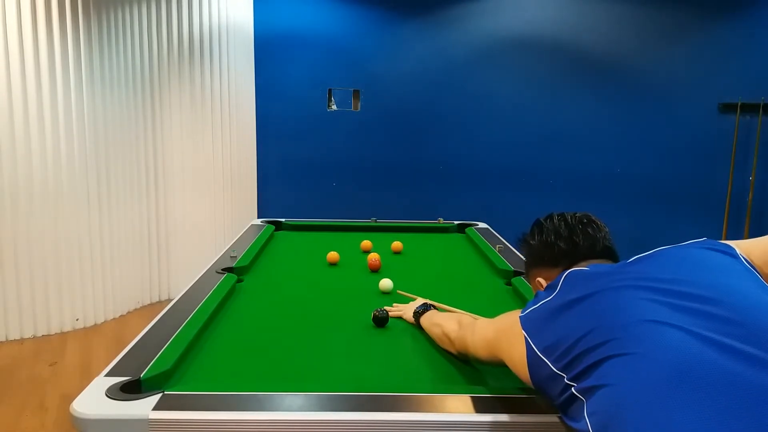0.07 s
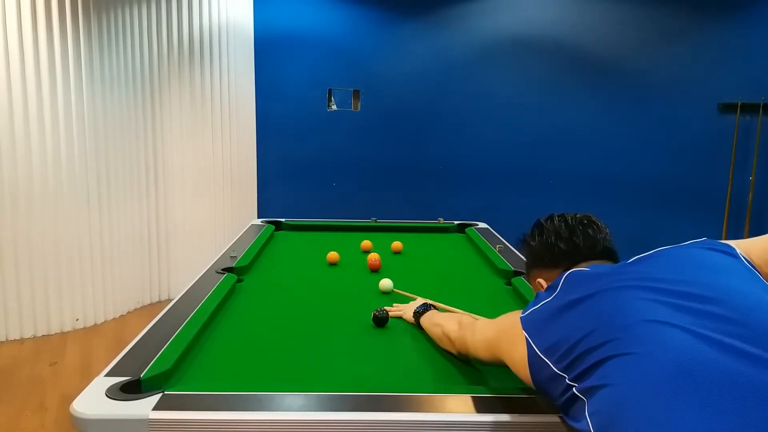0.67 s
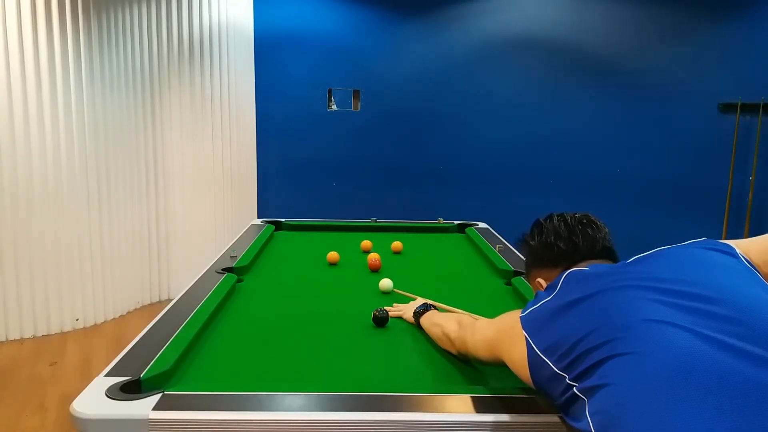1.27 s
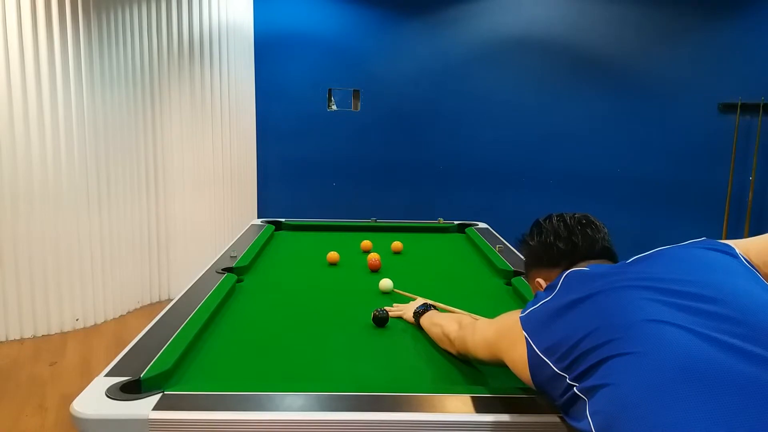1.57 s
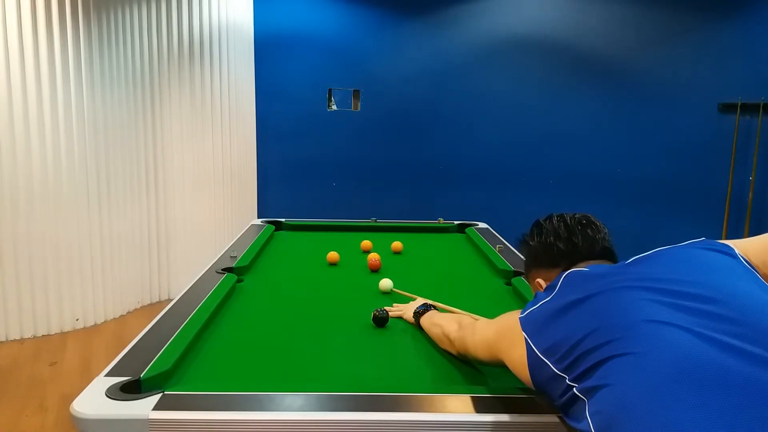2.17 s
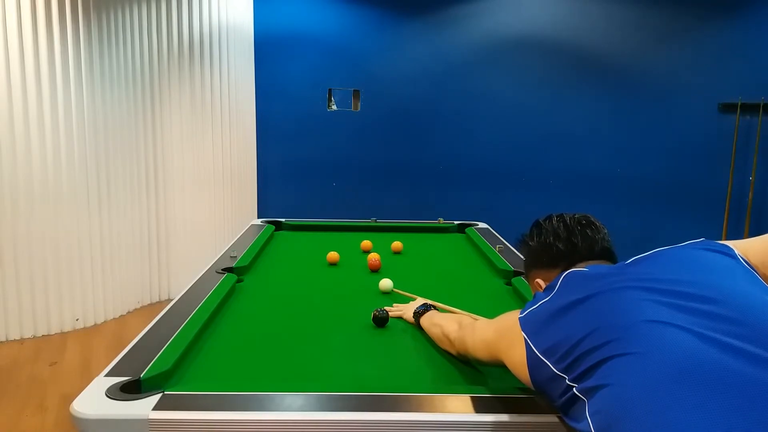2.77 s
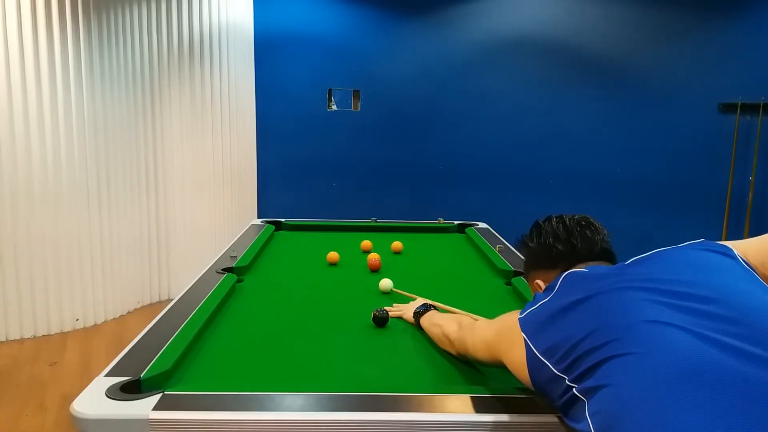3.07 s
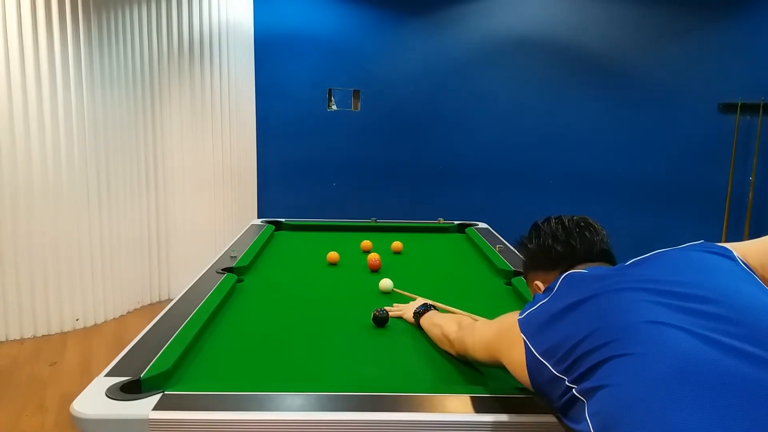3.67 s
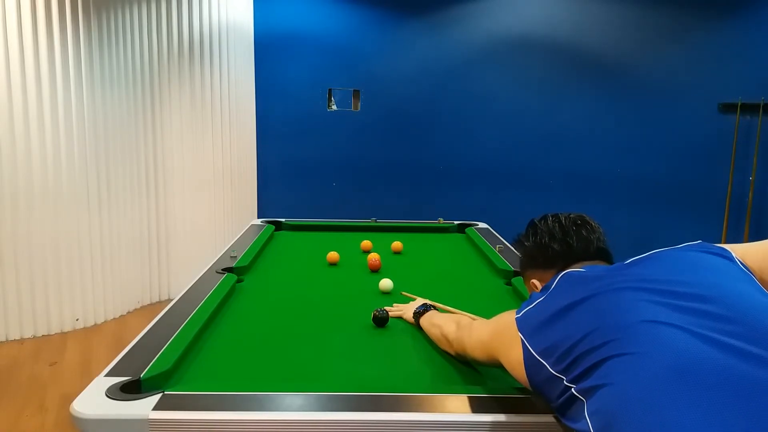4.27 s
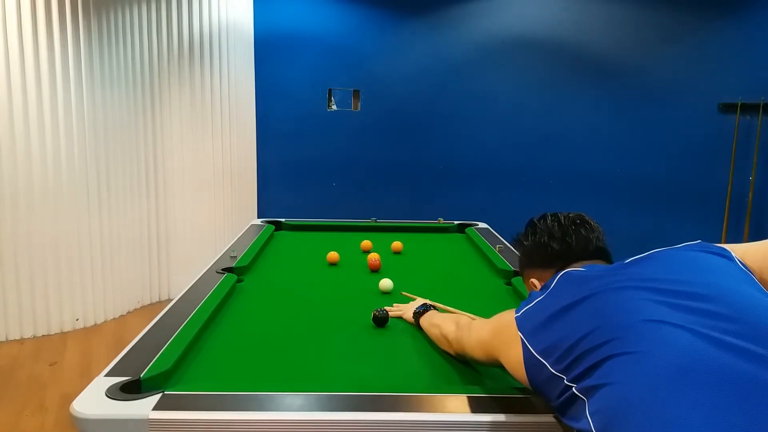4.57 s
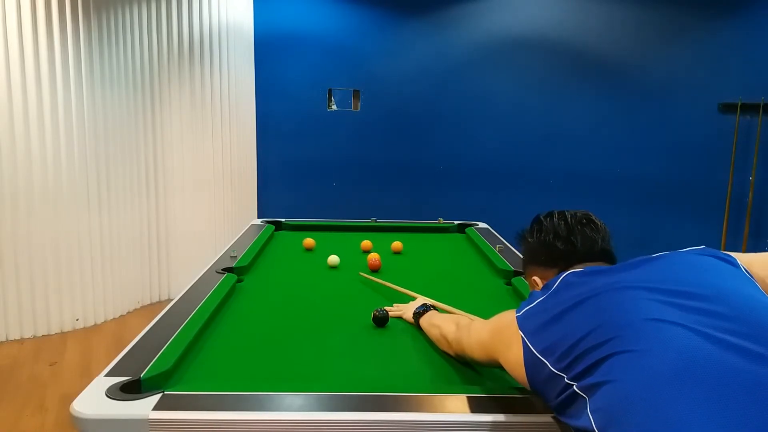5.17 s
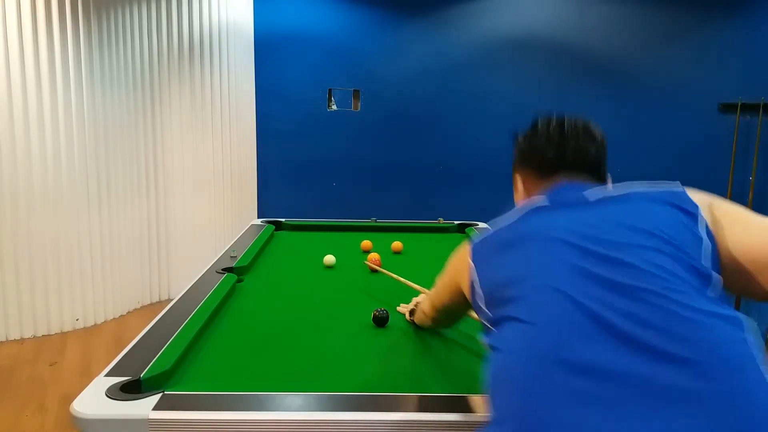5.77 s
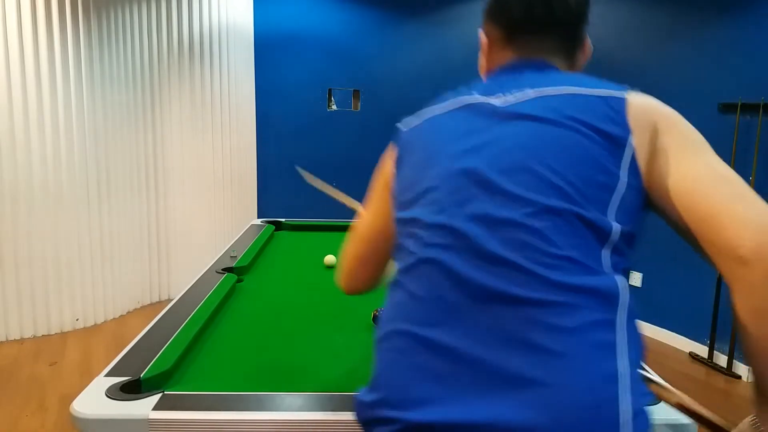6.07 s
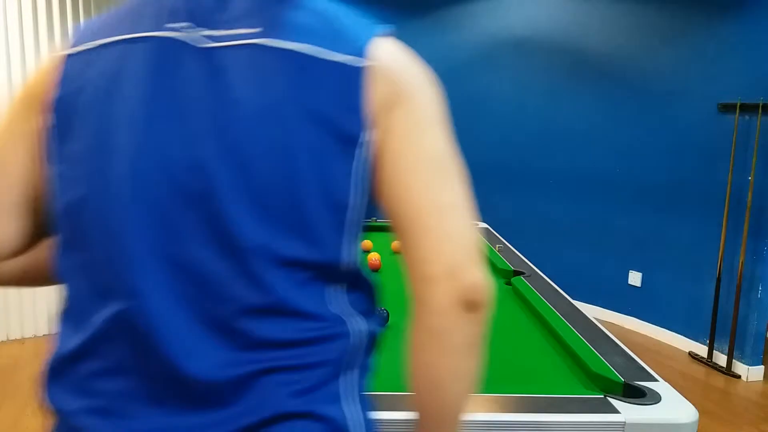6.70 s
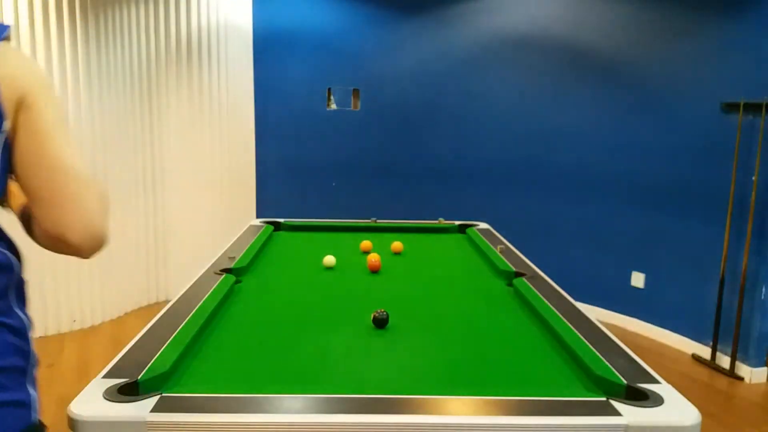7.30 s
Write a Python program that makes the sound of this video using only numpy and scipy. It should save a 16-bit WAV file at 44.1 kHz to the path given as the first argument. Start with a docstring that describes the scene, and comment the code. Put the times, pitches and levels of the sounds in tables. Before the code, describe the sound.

A single pool shot is heard from near the table in a quiet, reverberant room. At first there is only a low ventilation hum. Then comes the tap of the cue, a bright click of ball on ball, and the thud of a ball falling into a pocket. Clothes rustle as the player steps away, while the ball rolls hollowly inside the table and ends with loud knocks in the tray.

```python
"""A pool shot in a bare, echoing room: the cue's impact rings the shaft, and the cue ball clicks on an
object ball. That ball rolls over the cloth, bumps the jaws, drops into a pocket, rumbles down the return
channel and knocks into the tray. Each impact is a body's impulse response convolved with the room's;
rolling and friction are coloured noise under an envelope. The player steps away with rustling clothes.
Ventilation hums faintly throughout, and a far squeak sounds at the start."""
import sys
import numpy as np
from scipy import signal
from scipy.fft import rfft, irfft, next_fast_len
from scipy.io import wavfile
from scipy.ndimage import uniform_filter1d

SR = 44100
rng = np.random.default_rng(int(sys.argv[2]) if len(sys.argv) > 2 else 0)


def transcribe(u):
    """Save the signal u as a 16-bit wav file named by the first command-line argument.

    u: samples, shape (n,) or (channels, n), limited to [-1, 1]; the rate is SR.
    q: integer samples, one column per channel.
    """
    v = np.clip(np.atleast_2d(u).T, -1, 1)
    q = np.round(v * 32767).astype(np.int16)
    wavfile.write(sys.argv[1], SR, q)


N = 328104


def from_db(db):
    """Amplitude ratio of a level: a factor of ten per 20 dB."""
    return 10 ** (np.asarray(db) / 20)

def rms_one(x):
    """Normalisation to unit mean power."""
    return x / np.sqrt(np.mean(x ** 2) + 1e-20)

def at_hz(points, hz):
    """Interpolation of a table on a log-frequency axis."""
    f, value = np.transpose(points)
    return np.interp(np.log(np.maximum(hz, 1)), np.log(f), value)

def swell(middle_s, half_s):
    """Gaussian envelope of a movement that speeds up and slows down."""
    return np.exp(-np.minimum(((np.arange(N) / SR - middle_s) / half_s) ** 2, 20))

def stroke(peak_s, rise_s, t60):
    """Gaussian rise to a peak, then exponential decay."""
    since = np.arange(N) / SR - peak_s
    return np.where(since < 0, swell(peak_s, rise_s), from_db(-60 * np.abs(since) / t60))

def power_sum(gains):
    """Incoherent addition: the powers of unrelated noises add."""
    return np.sqrt(sum(gain ** 2 for gain in gains))

def balance(db):
    """Interchannel level difference, left minus right, as two gains."""
    return from_db(np.array([[.5], [-.5]]) * db)

# Coherence of left and right: (frequency [Hz], correlation [-1 to 1])
COHERENCE = [(40, .9), (120, .97), (250, .85), (500, .5), (1000, .05), (2000, -.05), (8000, -.05)]
def diffuse(size):
    """Spectrum of a diffuse white field: two points agree at long wavelengths only."""
    hz = np.fft.rfftfreq(size, 1 / SR)
    mid, side = rfft(rng.standard_normal((2, size)))
    alike = np.clip(at_hz(COHERENCE, hz), -1, 1)
    return hz, (np.sqrt(1 + alike) * mid + np.sqrt(1 - alike) * side * [[1], [-1]]) / np.sqrt(2)

def noise(spectrum):
    """Spectral shaping of diffuse noise, at unit rms."""
    size = next_fast_len(N, True)
    hz, white = diffuse(size)
    return rms_one(irfft(white * from_db(at_hz(spectrum, hz)) * (hz > 20), size)[:, :N])

def body(spectrum, modes, size=32768):
    """Impulse response of unit energy: Lorentzian resonances on a broad spectrum."""
    hz = np.fft.rfftfreq(size, 1 / SR)
    gain = from_db(at_hz(spectrum, hz))
    for f, width, db in modes:
        gain = gain * np.sqrt(1 + (from_db(db) ** 2 - 1) / (1 + (2 * (hz - f) / width) ** 2))
    cepstrum = irfft(np.log(gain))
    cepstrum[1:size // 2] *= 2  # minimum phase: nothing sounds before the contact
    cepstrum[size // 2 + 1:] = 0
    response = irfft(np.exp(rfft(cepstrum)))
    return response / np.sqrt(np.sum(response ** 2))

# Reverberation time: (frequency [Hz], T60 [s])
ROOM_T60 = [(100, 0.42), (250, 0.9), (700, 1.22), (1400, 1.53), (2300, 1.4), (4000, 1.055), (8000, 0.8),
            (15000, 0.51)]
# Early reflections: (left delay [s], right delay [s], level [dB])
REFLECTIONS = [(.0035, .0035, -10.5), (.0058, 0.0042, -5), (.0082, .0088, -9.5), (0.0236, 0.012, -45)]
def room(direct_db, wet_db, build_s, shade_hz, count, size=57344):
    """Room impulse responses: direct sound, reflections and a tail that decays band by band."""
    t, hz = np.arange(size) / SR, np.fft.rfftfreq(size, 1 / SR)
    white = np.array([diffuse(size)[1] for spot in range(count)], np.complex64)
    tail = np.zeros((count, 2, size), np.float32)
    centres, t60s = np.transpose(ROOM_T60)
    for t60, share in zip(t60s, np.eye(len(centres))):
        band = at_hz(np.c_[centres, share], hz).astype(np.float32)
        tail += irfft(white * band) * from_db(-60 * t / t60).astype(np.float32)
    early = np.zeros((2, size))
    early[:, 0] = 1
    for left_s, right_s, db in REFLECTIONS:
        early[[0, 1], [round(left_s * SR), round(right_s * SR)]] += from_db(db)
    # the table and the player's body screen the treble from the early paths
    early = signal.lfilter(*signal.butter(2, shade_hz, fs=SR), early + 1e-18)
    return from_db(direct_db) * early + from_db(wet_db) * (1 - np.exp(-t / build_s)) * tail

def radiate(hits, response, direct_db, wet_db, build_s, shade_hz):
    """Superposition: at each hit the response is convolved with its own path through the room."""
    out = np.zeros((2, N))
    for (s, db), path in zip(hits, room(direct_db, wet_db, build_s, shade_hz, len(hits))):
        start = round(s * SR)
        heard = signal.fftconvolve(path[:, :N - start], response[None], axes=1)[:, :N - start]
        out[:, start:start + heard.shape[1]] += from_db(db) * heard
    return out

# Ventilation hum and microphone hiss: (frequency [Hz], level [dB])
AIR_SPECTRUM = [(15, -44), (25, -16), (37, -0.5), (64, -8.5), (86, -1), (116, -5), (144, 0.5), (173, -10.5),
                (193, -6), (221, -12.5), (289, -8.5), (445, -17), (2120, -20.5), (7100, -37),
                (15500, -28.5)]
def ventilation(level_db=-62):
    """Stationary noise: a low hum under faint hiss, a little louder on the right."""
    return from_db(level_db) * balance(-1.4) * noise(AIR_SPECTRUM)

def squeak(start_hz=1300, sag_hz_per_s=320, waver_depth=.04):
    """Frequency modulation: a faint, far tone wavers at random as its pitch sags."""
    t = np.arange(SR) / SR
    waver = rms_one(uniform_filter1d(rng.standard_normal(SR), size=300))
    pitch = (start_hz - sag_hz_per_s * t) * (1 + waver_depth * waver)
    tone = swell(middle_s=.15, half_s=.17)[:SR] * np.sin(2 * np.pi * np.cumsum(pitch) / SR)
    return radiate([(.0033, -73)], tone, direct_db=-2, wet_db=-36, build_s=.01, shade_hz=3000)

# Blows on the floor and on the cabinet panels: (time [s], level [dB])
STEPS = [(6.58, -26), (6.83, -26.5)]
PANEL_HITS = [(4.935, -21.5), (7.225, -23), (7.407, -8), (7.424, -14)]
# Boom of either surface: (frequency [Hz], level [dB])
PANEL_SPECTRUM = [(25, -47), (50, -27), (66, -14), (95, -16), (140, -10), (400, -30), (2000, -70)]
# Its resonances: (frequency [Hz], bandwidth [Hz], gain [dB])
PANEL_MODES = [(70, 12, 9), (92, 16, 13)]
def floor_and_panels():
    """Plate vibration: footfalls on the wooden floor and blows on the cabinet excite low modes."""
    plate = body(PANEL_SPECTRUM, PANEL_MODES)
    steps = radiate(STEPS, plate, direct_db=-4, wet_db=-24.5, build_s=.004, shade_hz=1030)
    boom = radiate(PANEL_HITS, plate, direct_db=3, wet_db=-20, build_s=.0035, shade_hz=1000)
    return steps + boom

# Small contacts as the player moves: (time [s], level [dB])
TICK_HITS = [(5.453, -30), (6.265, -33), (6.422, -17.5), (7.0675, -34)]
SNAP_HITS = [(6.7658, -20)]
# Their spectra: (frequency [Hz], level [dB])
TICK_SPECTRUM = [(40, -39), (500, 16), (2500, 6), (4700, 6.5), (6500, -1), (8500, 0.5), (15000, -11)]
SNAP_SPECTRUM = [(30, -37), (200, 7), (1000, -2), (2500, -7), (6000, -12), (10000, -10), (15000, -13)]
# Resonances of the snap: (frequency [Hz], bandwidth [Hz], gain [dB])
SNAP_MODES = [(2300, 600, 4), (10000, 1300, 11)]
def ticks_and_snap():
    """Broadband transients: light ticks and one thin snap close by."""
    ticks = radiate(TICK_HITS, body(TICK_SPECTRUM, []),
                    direct_db=2, wet_db=-19.5, build_s=.0018, shade_hz=4000)
    snap = radiate(SNAP_HITS, body(SNAP_SPECTRUM, SNAP_MODES),
                   direct_db=3.5, wet_db=-24, build_s=.002, shade_hz=14000)
    return ticks + snap

# The player straightens, turns, swings an arm, walks on: (time [s], half length [s], level [dB])
MOVES = [(5.806, 0.17, -41), (6.246, 0.19, -39.5), (6.96, 0.049, -44), (6.955, .28, -46)]
# Strokes over the cloth: (peak time [s], rise [s], level [dB])
BRUSHES = [(5.10, 0.044, -67), (5.68, 0.38, -58), (5.752, 0.018, -38.5), (5.96, .04, -55), (6.25, .1, -59),
           (6.76, 0.048, -55.5), (6.96, .05, -48), (7.085, 0.029, -49.5)]
# Rustling clothes and brushed nap: (frequency [Hz], level [dB])
RUSTLE_SPECTRUM = [(40, -33), (200, -7), (800, -21), (1500, 13), (2300, 18.5), (4000, 6), (6500, -5.5),
                   (15000, -23)]
NAP_SPECTRUM = [(300, -40), (2000, 7), (4500, 9), (6500, -5), (9000, 4), (15500, -3)]
def rubbing_fabric():
    """Friction noise: clothes rustle, and hand, cue or sleeve brushes the cloth."""
    rustle = power_sum(from_db(db) * swell(s, half_s) for s, half_s, db in MOVES)
    swish = power_sum(from_db(db) * stroke(s, rise_s, t60=.6) for s, rise_s, db in BRUSHES)
    return rustle * noise(RUSTLE_SPECTRUM) + swish * noise(NAP_SPECTRUM)

# A ball is sent rolling by the cue, the other ball or a cushion: (peak time [s], level [dB])
ROLLS = [(4.92, -46), (5.07, -51), (5.55, -49)]
# Rumble on the slate: (frequency [Hz], level [dB])
SLATE_SPECTRUM = [(40, -32), (100, 7.5), (140, -5.5), (200, 9), (280, -10), (500, -16), (1500, -41)]
def table_roll(nap_db=-12.5):
    """Rolling noise: the slate's rumble and the nap's hiss decay as a ball slows."""
    envelope = power_sum(from_db(db) * stroke(s, rise_s=.017, t60=2.24) for s, db in ROLLS)
    return envelope * (noise(SLATE_SPECTRUM) + from_db(nap_db) * noise(NAP_SPECTRUM))

# The ball runs onto the pocket's lip, then into the channel: (peak time [s], level [dB])
TUMBLES = [(5.75, -41), (6.3, -38.5)]
# Hollow rumble of the channel: (frequency [Hz], level [dB])
RUMBLE_SPECTRUM = [(40, -23), (100, -10), (200, 1), (340, 4.5), (480, -3.5), (700, -3), (1200, -9),
                   (3000, -34)]
def channel_roll(slope_start_s=6.24, slope_db=-53, growth_db_per_s=12.5):
    """Rolling noise grows with speed: two tumbles, then a crescendo down the slope."""
    tumbles = power_sum(from_db(db) * stroke(s, rise_s=.08, t60=1.2) for s, db in TUMBLES)
    since = np.arange(N) / SR - slope_start_s
    slope = from_db(slope_db + growth_db_per_s * since) * (since > 0)
    return power_sum([tumbles, slope]) * noise(RUMBLE_SPECTRUM)

# Knocks in the return channel and the tray: (time [s], level [dB])
CHANNEL_HITS = [(7.165, 6), (7.169, 11.5), (7.178, 12), (7.224, 8.5), (7.258, 3.5)]
TRAY_HITS = [(7.329, 6.2), (7.335, 15.7), (7.359, 6.9), (7.378, 7), (7.407, 2.5), (7.431, 2.35)]
# Their spectra: (frequency [Hz], level [dB])
CHANNEL_SPECTRUM = [(25, -47), (60, -30), (120, -9.5), (230, 1.5), (600, 0.5), (1200, -2), (2000, -10.5),
                    (3000, -24), (4500, -34.5), (6500, -50), (15000, -54)]
TRAY_SPECTRUM = [(25, -43), (90, -6.5), (220, 2), (400, -12), (600, 1.5), (1100, -2), (2000, -2),
                 (3000, -12.5), (4700, -17), (6500, -28.5), (9000, -25), (15000, -38)]
# Their resonances: (frequency [Hz], bandwidth [Hz], gain [dB])
CHANNEL_MODES = [(237, 14, 6), (361, 14, 3), (517, 14, 10), (657, 12, 5), (748, 14, 9), (1007, 14, 5),
                 (1303, 18, 8), (2580, 36, 9)]
TRAY_MODES = [(203, 14, 11), (232, 14, 11), (538, 14, 15), (1000, 40, 5), (1491, 20, 9), (1663, 20, 11),
              (2480, 60, 6), (3100, 36, 19), (3580, 60, 7), (4720, 90, 10)]
def ball_return():
    """Modal ringing: the ball knocks dully inside the cabinet, then more brightly in the tray."""
    channel = radiate(CHANNEL_HITS, body(CHANNEL_SPECTRUM, CHANNEL_MODES),
                      direct_db=-9.5, wet_db=-28.5, build_s=.00068, shade_hz=1540)
    tray = radiate(TRAY_HITS, body(TRAY_SPECTRUM, TRAY_MODES),
                   direct_db=-8.5, wet_db=-32, build_s=.00078, shade_hz=3520)
    return channel + tray

# Impacts on the jaws and liner, and on the pocket floor: (time [s], level [dB])
JAW_HITS = [(5.715, -2.5), (5.738, 3), (5.749, 6.5), (5.761, 7), (5.778, 2.5), (5.812, -0.5), (5.930, 8.5)]
DROP_HITS = [(5.8722, 12.9), (5.8785, 10.4), (5.902, 2.9), (5.928, 3.3)]
# Their spectra: (frequency [Hz], level [dB])
JAW_SPECTRUM = [(25, -52), (50, -21), (90, -12.5), (190, 0.5), (340, -5), (450, -6.5), (900, -10.5),
                (2200, -20.5), (4000, -40), (6500, -39), (15000, -58)]
DROP_SPECTRUM = [(50, -21), (120, -10), (200, -3.5), (350, 7), (440, -7), (750, 5), (1200, -7.5),
                 (1700, -4.5), (2500, -4), (3800, -13.5), (6500, -23.5), (9000, -25.5), (15000, -38)]
# Pocket resonances: (frequency [Hz], bandwidth [Hz], gain [dB])
POCKET_MODES = [(205, 9, 12), (307, 14, 4), (711, 16, 7), (795, 40, 4), (1680, 22, 8), (1900, 16, 6),
                (2073, 16, 8), (2385, 20, 9), (4330, 160, 5)]
def pocket():
    """Contact stiffness sets bandwidth: rubber jaws excite two low modes, the hard floor all."""
    jaws = radiate(JAW_HITS, body(JAW_SPECTRUM, POCKET_MODES[:2]),
                   direct_db=-7.5, wet_db=-34.5, build_s=.00092, shade_hz=910)
    drop = radiate(DROP_HITS, body(DROP_SPECTRUM, POCKET_MODES),
                   direct_db=-5, wet_db=-29, build_s=.0011, shade_hz=2700)
    return jaws + drop

# Impacts of cue on ball and of ball on ball: (time [s], level [dB])
CUE_HITS = [(4.8817, -11.5), (4.8845, 2.5)]
BALL_HITS = [(5.0513, 9.9)]
# Their spectra: (frequency [Hz], level [dB])
CUE_SPECTRUM = [(25, -23), (90, -18), (280, -5.5), (900, -2), (1500, -5.5), (2100, -10.5), (3000, -18.5),
                (4500, -25.5), (6000, -41.5), (15000, -42)]
BALL_SPECTRUM = [(30, -45), (100, -30), (450, -59), (700, -18), (1100, -11), (1700, -4), (2100, 0),
                 (2450, 0), (3100, -4.5), (4000, -12.5), (5000, -22.5), (6500, -47), (15000, -42.5)]
# Shaft resonances and one notch: (frequency [Hz], bandwidth [Hz], gain [dB])
CUE_MODES = [(195, 14, 5), (280, 10, 8), (1575, 30, 8), (1757, 14, 19), (1930, 260, -20), (2170, 16, 13),
             (2519, 22, 9), (2864, 24, 8), (3160, 40, 6), (3548, 24, 12), (3994, 20, 12), (4430, 22, 10)]
def shot():
    """Elastic impact: the leather tip rings the shaft; two hard balls meet in one short pulse."""
    cue = radiate(CUE_HITS, body(CUE_SPECTRUM, CUE_MODES),
                  direct_db=-2, wet_db=-30, build_s=.0024, shade_hz=2580)
    click = radiate(BALL_HITS, body(BALL_SPECTRUM, []),
                    direct_db=-2, wet_db=-25.5, build_s=.02, shade_hz=5760)
    return cue + click

# Left microphone relative to right: (frequency [Hz], level [dB])
LEFT_MINUS_RIGHT = [(100, -0.4), (500, -1.4), (2000, -1.9), (4500, -2), (6500, -2), (8500, 3.5), (11000, 2),
                    (14000, -1.8)]
def microphones(sound):
    """Level difference by frequency: most bands lean right, the treble near 10 kHz left."""
    size = next_fast_len(N + SR // 10, True)
    gains = balance(at_hz(LEFT_MINUS_RIGHT, np.fft.rfftfreq(size, 1 / SR)))
    return irfft(rfft(sound, size) * gains, size)[:, :N]

def scene():
    """Linear superposition of all sources over the steady air."""
    air = ventilation()
    balls = shot() + pocket() + ball_return() + table_roll() + channel_roll()
    background = rubbing_fabric() + ticks_and_snap() + floor_and_panels() + squeak()
    return microphones(balls + background) + air

def record(dry, low_cut_hz=40, high_cut_hz=15850):
    """Band limiting and clipping: a high-pass, a hard limit at full scale, a steep low-pass."""
    high_passed = signal.sosfilt(signal.butter(2, low_cut_hz, "high", fs=SR, output="sos"), dry)
    clipped = np.clip(high_passed, -1, 1)
    return signal.sosfilt(signal.ellip(12, .1, 90, high_cut_hz, fs=SR, output="sos"), clipped)


dry = scene()
out = record(dry)
transcribe(out)
```